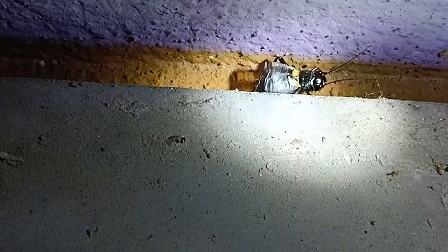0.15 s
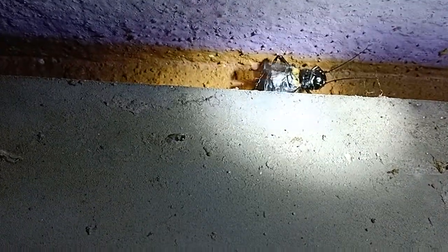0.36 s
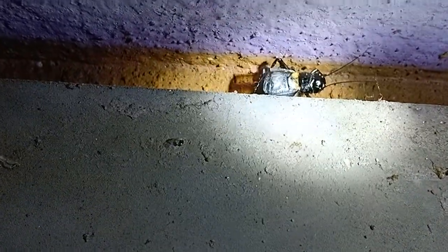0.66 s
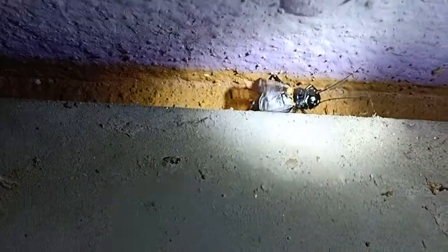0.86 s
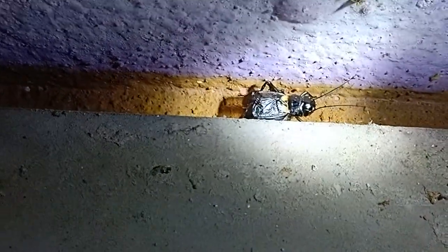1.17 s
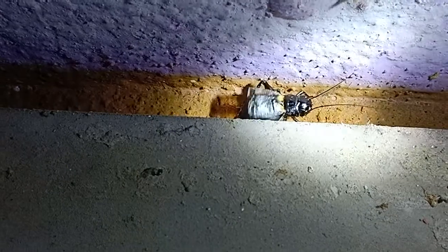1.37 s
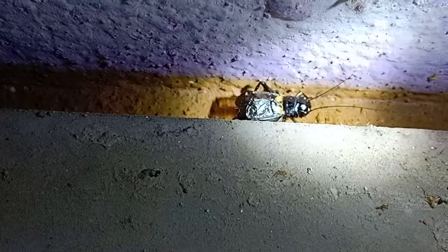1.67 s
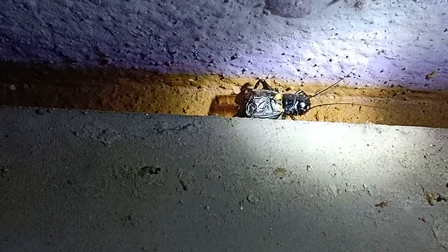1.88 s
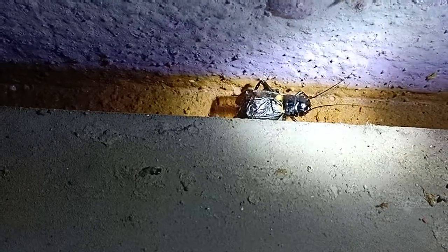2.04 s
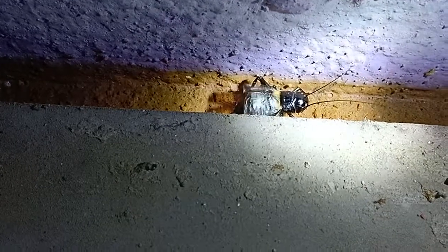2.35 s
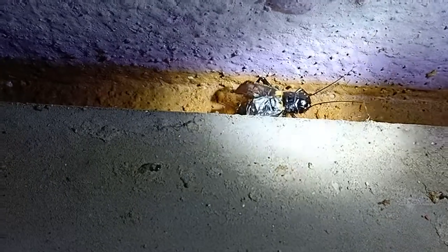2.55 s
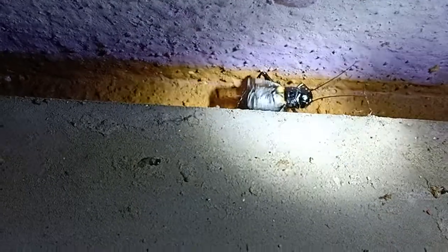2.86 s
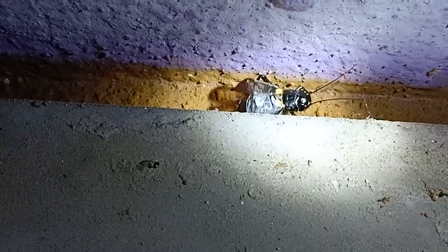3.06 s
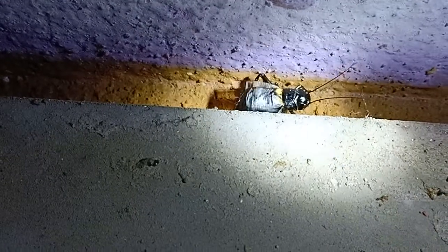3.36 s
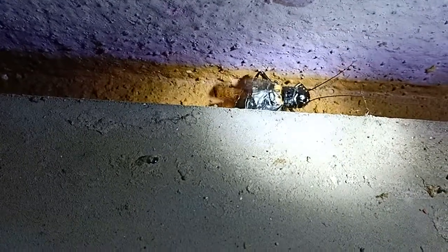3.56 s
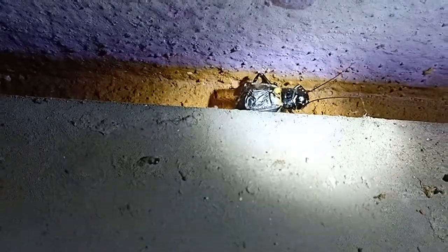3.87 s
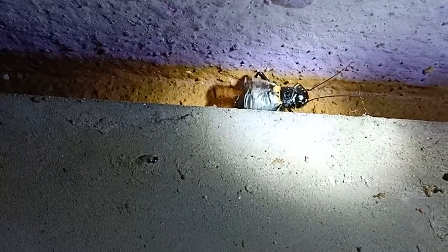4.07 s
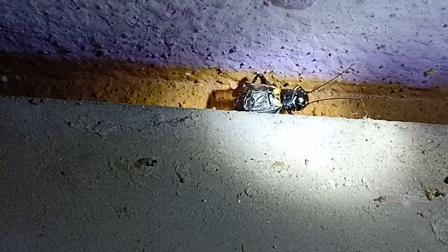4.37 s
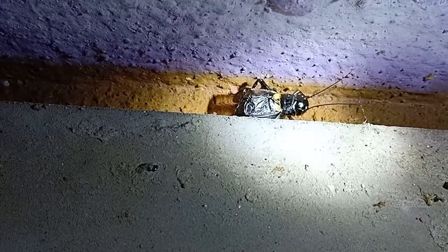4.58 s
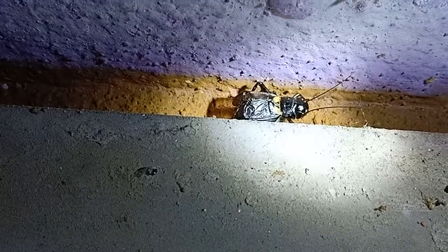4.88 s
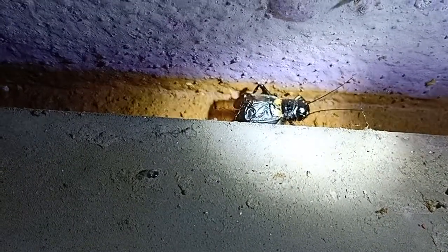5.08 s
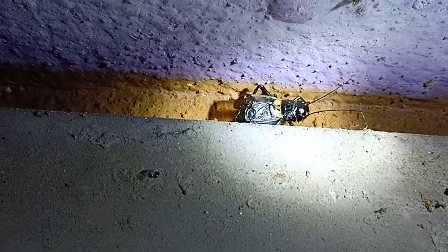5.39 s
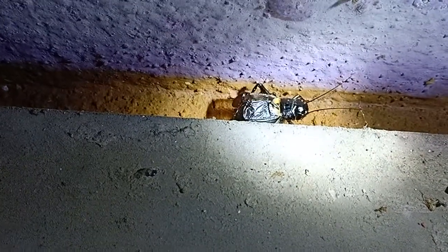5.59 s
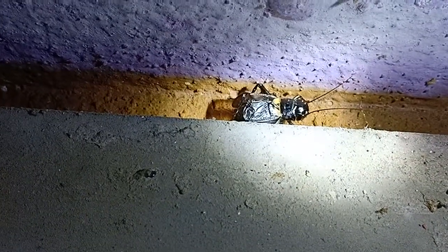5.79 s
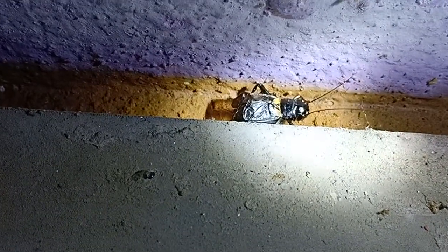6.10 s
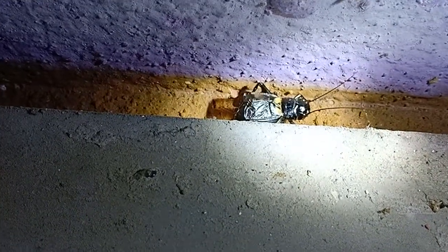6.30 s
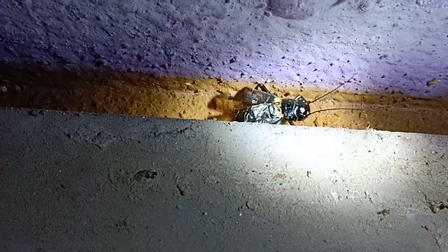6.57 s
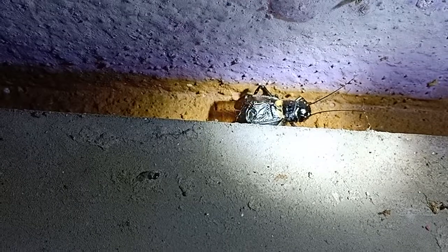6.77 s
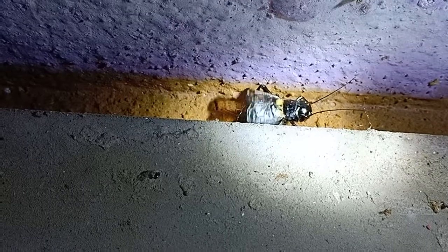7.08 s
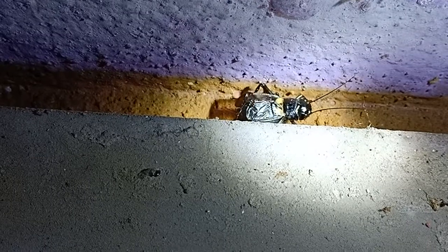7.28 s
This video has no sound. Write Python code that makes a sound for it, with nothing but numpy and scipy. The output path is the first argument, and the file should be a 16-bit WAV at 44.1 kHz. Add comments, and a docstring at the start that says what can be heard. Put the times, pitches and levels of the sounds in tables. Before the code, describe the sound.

A cricket very close by sings loud, shrill, pulsing chirps about four times a second on a quiet night, with a short pause near the end.

```python
"""A cricket sings at night in the angle of a wall and a step, a hand's width from a handheld phone.
We join it mid-chirp. Each wing stroke is a tone gliding down; mostly four make a chirp. Near faces echo
it, the yard rings on, and overloaded microphones add a thump and overtones. From 0.55 to 1.5 s the hand
turns the phone, shifting the echoes. Near 5.8 s the song pauses while a far insect's note swells; the
chirps then resume, with a slower one and one of five strokes near the end. A low town rumble, faint hums
and other distant insects, all made of filtered noise, lie under everything."""
import sys
import numpy as np
from scipy import signal
from scipy.fft import rfft, irfft, next_fast_len
from scipy.io import wavfile

SR = 44100
rng = np.random.default_rng(int(sys.argv[2]) if len(sys.argv) > 2 else 0)


def linear_from_db(decibels):
    """Turn decibels (scalar or array-like) into linear amplitude factors; 0 gives 1."""
    return 10 ** (np.asarray(decibels, float) / 20)


def wav_record(signal):
    """Record a signal, one row per channel, as 16-bit PCM in the file named by sys.argv[1]."""
    frames = np.transpose(np.atleast_2d(signal))
    bounded = np.clip(frames, -1, 1)
    # unit amplitude maps onto the largest positive 16-bit level
    quanta = np.round(bounded * 32767).astype(np.int16)
    wavfile.write(sys.argv[1], SR, quanta)


N = 328104  # length in samples
LEAD_S = .12  # song made ahead of time zero, so that echoes of it can already be heard there

# How the pitch slides during one stroke, before a small random retuning: share_done, pitch_hz
STROKE_GLIDE = [(0, 5800), (.08, 5698), (.32, 5561), (.66, 5378), (.89, 5282), (1, 5154)]


def cricket():
    """The scraper runs over the file: the wing swells, slides down in pitch and stops short."""
    rise_share, rise_bend, fall_share, onset_share = .84, .82, .11, .048
    wing_second_db, scrape_db = -42.5, -34  # against the main tone
    wing_low_hz = 4800  # the wing radiates little below this
    song = np.zeros(N + int(LEAD_S * SR))
    rows = strokes()
    chance = rng.random((len(rows), 2))
    scrape = shaped((len(song),), lambda hz: 1 / (1 + ((hz - 5500) / 342.0) ** 2))
    for (end_s, level_db, length_ms), (start_turn, tune) in zip(rows, chance):
        done = np.arange(0, 1, 1000 / (length_ms * SR))
        pitch_hz = np.interp(done, *np.transpose(STROKE_GLIDE)) * (1 + 0.0034 * (tune - .5))
        phase = 2 * np.pi * (np.cumsum(pitch_hz) / SR + start_turn)

        rise = np.minimum(done / rise_share, 1) ** rise_bend
        fall = np.sin(np.pi / 2 * np.minimum((1 - done) / fall_share, 1)) ** 2
        onset = np.sin(np.pi / 2 * np.minimum(done / onset_share, 1)) ** 2
        swell = rise * fall * onset

        start = int((end_s + LEAD_S) * SR) - len(done)
        place = slice(start, start + len(done))
        wing = np.sin(phase) + linear_from_db(wing_second_db) * np.sin(2 * phase)
        song[place] += linear_from_db(level_db) * swell * (wing + linear_from_db(scrape_db) * scrape[place])
    highpass = signal.cheby1(4, .3, wing_low_hz, "high", fs=SR, output="sos")
    return signal.sosfilt(highpass, song)


# The chirps, in order: first_stroke_end_s, last_stroke_end_s, level_db,
# third_stroke_delay_ms (below zero: it comes early)
CHIRP_TIMES = [(-0.0795, 0.015, -1.5, 0), (0.15, 0.243, -0.22, -1), (0.366, 0.4595, 0.13, 0),
               (0.5774, 0.6712, -1.16, 0), (0.8007, 0.8943, -1.16, -1), (1.0201, 1.113, -0.4, 0.5),
               (1.3028, 1.3944, 0.2, 0), (1.5209, 1.615, 0.5, 0), (1.7338, 1.8264, -0.4, 0.5),
               (1.9362, 2.0295, -0.26, -2), (2.1512, 2.2446, 0.06, 0.5), (2.3649, 2.4581, 0.05, -1),
               (2.591, 2.6894, 0.54, 2.5), (2.8188, 2.912, -0.86, -0.5), (3.0607, 3.155, -0.46, 1.5),
               (3.291, 3.3845, 0.03, 0), (3.5117, 3.6067, 0.3, 0), (3.7492, 3.846, -0.1, 1.5),
               (4.0387, 4.131, -0.5, 0), (4.2483, 4.3436, -0.1, -1), (4.4911, 4.5863, -0.65, 0),
               (4.746, 4.842, 0.3, 1), (4.9842, 5.0774, 0.65, -1.5), (5.218, 5.3129, -0.33, 1),
               (5.462, 5.5558, -0.5, 0.5), (5.6993, 5.7939, 0.5, 2), (6.1617, 6.2552, 1.5, -0.5),
               (6.3898, 6.483, 0.5, 1), (6.6115, 6.7057, -0.1, 1.5), (6.8484, 6.956, 0.37, 7),
               (7.1067, 7.2353, 0.47, 0), (7.359, 7.4205, -0.7, 0.5)]


def strokes():
    """Each chirp holds as many strokes as fit; each comes slower, lasts longer and is weaker than the last.

    Gives rows of end_s, level_db, length_ms, with level and length a little uneven."""
    pace_s, slowing = .032, .025  # usual spacing; growth of the spacing per stroke
    stroke_ms, longer_ms, weaker_db = 17.3, .35, 0.09
    scatter_ms, scatter_db = .4, 0.63
    rows = []
    for first_s, last_s, level_db, delay_ms in CHIRP_TIMES:
        k = np.arange(round((last_s - first_s) / pace_s) + 1)
        delay_s = (k >= 2) * delay_ms / 1000
        pace = k * (1 + slowing * k)
        ends = first_s + delay_s + (last_s - first_s - delay_s[-1]) * pace / pace[-1]
        rows += zip(ends, level_db - weaker_db * k, stroke_ms + longer_ms * k)
    scatter = rng.standard_normal((len(rows), 3)) * [0, scatter_db, scatter_ms]
    return np.array(rows) + scatter


# The hand turns the phone: time_s, share_of_turn_done, left_microphone_level_db
HAND_TURN = [(.55, 0, -1), (.951, 0.17, 0), (1.5, 0.99, 0.5), (3.9, 0.94, .8), (5.1, 1, 0),
             (6.5, 0.99, -1.7)]


def near_paths(song, paths):
    """Direct sound and echoes off step and wall; they beat into notches that shift with the hand."""
    fine = signal.resample_poly(song, 4, 1)  # finer samples, so delays can slide smoothly
    n = np.arange(N)
    turn = np.interp(n / SR, *np.transpose(HAND_TURN)[:2])
    heard = 0
    for before_ms, after_ms, before_db, after_db in paths:
        delay_s = (before_ms + turn * (after_ms - before_ms)) / 1000
        gain = linear_from_db(before_db + turn * (after_db - before_db))
        place = n + SR * (LEAD_S - delay_s)
        heard = heard + gain * np.interp(4 * place, np.arange(len(fine)), fine)
    return heard


# Sound paths to the two microphones; the left one's gains are further moved by the hand's level.
# Both tables: delay_before_turn_ms, delay_after_turn_ms, gain_before_db, gain_after_db
LEFT_PATHS = [(1.152, 1.113, -11.9, -14.3), (2.367, 2.403, 0.9, -9.2), (3.803, 3.806, -10.4, -6.8),
              (4.923, 4.999, -13.2, -8.8), (6.812, 6.806, -14.8, -14), (8.005, 8.055, -16.0, -16),
              (11.882, 11.879, -17.3, -18.6), (13.978, 14.005, -24.4, -17.6),
              (18.457, 18.463, -11.1, -13.2)]
RIGHT_PATHS = [(0.744, 0.767, -14.4, -18.7), (2.05, 2.049, -2.2, -1.3), (3.217, 3.218, -2.6, -3.6),
               (4.231, 4.23, -4.4, -5.5), (5.924, 5.999, -27.2, -17), (6.973, 6.997, -15.3, -16.1),
               (9.745, 9.748, -21.0, -19.8), (13.39, 13.416, -20.8, -20), (17.381, 17.387, -18.8, -22.1)]


def near_sound(song):
    """Each microphone hears its own set of paths; the hand also changes the left one's level."""
    left_db = np.interp(np.arange(N) / SR, *np.transpose(HAND_TURN)[::2])
    left = linear_from_db(left_db) * near_paths(song, LEFT_PATHS)
    return np.array([left, near_paths(song, RIGHT_PATHS)])


# Late echoes; the close walls die first, the yard rings on:
# start_s, time_to_fall_60_db_s, left_db, right_db
YARD_ECHOES = [(0.017, 0.114, -17, -15), (0.032, 0.37, -19.5, -22.5)]


def yard(song):
    """Dense late echoes, unrelated at the two microphones: the song smeared by fading noise."""
    t = np.arange(SR // 2) / SR
    tail = 0
    for start_s, t60_s, *level_db in YARD_ECHOES:
        fade = np.clip((t - start_s) / 0.0059, 0, 1) * linear_from_db(-60 * t / t60_s)
        fade = fade / np.sqrt(np.sum(fade ** 2))
        tail = tail + linear_from_db(level_db)[:, None] * rng.standard_normal((2, len(t))) * fade
    return signal.fftconvolve(song[None], tail, axes=1)[:, int(LEAD_S * SR):][:, :N]


# Colour of the night air, only the shape counts: pitch_hz, relative_level_db
AIR_COLOUR = [(24, -61), (40, -33.5), (112, 3.5), (249, -22), (315, -4.5), (474, -2), (687, -24),
              (2000, -16.5), (3000, -17.5), (3740, -16), (4300, -36), (9000, -58.5), (20000, -73.5)]
# Faint narrow sounds further off: pitch_hz, width_hz, level_before_throb_db, throbs_per_s
FAINT_TONES = [(7100, 150, -80, 25), (5500, 500, -76, 0), (393, 8, -73, 0), (463, 8, -75, 0)]
# A far insect's steady note: time_s, level_db
FAR_INSECT = [(0, -89), (5.45, -89), (5.65, -78), (5.95, -78), (6.5, -85), (7.44, -89)]


def night():
    """Low town rumble, partly shared by both microphones, with faint hums and insects further off."""
    air_db, insect_hz = -68.5, 2832  # air_db: rms of each of the own and shared parts, on average
    t = np.arange(N) / SR
    hz_points, db_points = np.transpose(AIR_COLOUR)
    air = shaped((3, N), lambda hz: linear_from_db(np.interp(np.log(hz), np.log(hz_points), db_points)))
    sound = linear_from_db(air_db) * (air[:2] + air[2])  # own part plus shared part

    for centre_hz, width_hz, level_db, rate in FAINT_TONES:
        throb = 1 + np.sin(2 * np.pi * rate * t)
        tone = shaped((2, N), lambda hz: np.exp(-((hz - centre_hz) / width_hz) ** 2))
        sound = sound + linear_from_db(level_db) * throb * tone

    insect = shaped((2, N), lambda hz: np.exp(-((hz - insect_hz) / 15.) ** 2))
    return sound + linear_from_db(np.interp(t, *np.transpose(FAR_INSECT))) * insect


def shaped(shape, gain_at):
    """Noise with the given gain at each frequency, scaled to rms 1."""
    hz = np.fft.rfftfreq(shape[-1], 1 / SR) + 1
    noise = irfft(rfft(rng.standard_normal(shape)) * gain_at(hz), shape[-1])
    return noise / np.sqrt(np.mean(noise ** 2))


def scene():
    """Cricket by near paths and by the yard, over the night."""
    song = cricket()
    return near_sound(song) + yard(song) + night()


# Overdriven membrane, all in full scale (rasp before it is made patchy):
# swing, rest_point_shift, second_overtone, rasp
MEMBRANE_BEND = [(0, -0.0076, 0.00012, 0.000027), (.2, -0.014, 0.00061, 0.0011),
                 (0.349, -0.054, 0.0093, 0.0014), (0.502, -0.13, 0.026, 0.0018),
                 (0.571, -0.05, 0.023, 0.0022), (.9, 0.095, 0.05, 0.0046)]
# Third overtone, as gain on the cubed swing: left_db, right_db
THIRD_OVERTONE = (-52, -30.5)


def membranes(dry):
    """Loud tones push the membranes aside until they meet their stop, adding thump, rasp and overtones."""
    z = signal.hilbert(dry, next_fast_len(N))[:, :N]  # its size is the swing at each moment
    z = z / (1 + (np.abs(z) / .9) ** 8) ** (1 / 8)  # soft stop at 0.9 of full scale
    size = np.abs(z) + 1e-9
    swing, *columns = np.transpose(MEMBRANE_BEND)
    rest, second, rasp = (np.interp(size, swing, c) for c in columns)
    thump = signal.sosfilt(signal.butter(2, 1300, fs=SR, output="sos"), rest)

    patchy = linear_from_db(3.5 * shaped((2, N), lambda hz: np.exp(-(hz / 25) ** 2)))  # 3.5 dB rms, slow
    rasp = rasp * patchy * shaped((2, N), lambda hz: 1 / (1 + (hz / 4600.0) ** 4))

    second_tone = second * (z / size) ** 2  # squaring doubles the pitch
    third_tone = linear_from_db(THIRD_OVERTONE)[:, None] * z ** 3  # cubing triples it
    overtones = (second_tone + third_tone).real
    return z.real + thump + rasp + overtones


def roll_off(x):
    """The treble ends steeply here."""
    return signal.sosfilt(signal.butter(12, 19030, fs=SR, output="sos"), x)


def record(dry):
    """The phone: overdriven membranes, then bass and top are cut."""
    low_hz, top_hz = 80, 15650
    sound = membranes(dry)
    sound = signal.sosfilt(signal.butter(4, low_hz, "high", fs=SR, output="sos"), sound)
    sound = signal.sosfilt(signal.ellip(8, .2, 70, top_hz, fs=SR, output="sos"), sound)
    return roll_off(sound)


dry = scene()
out = record(dry)
wav_record(out)
```